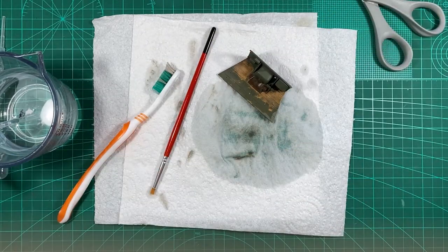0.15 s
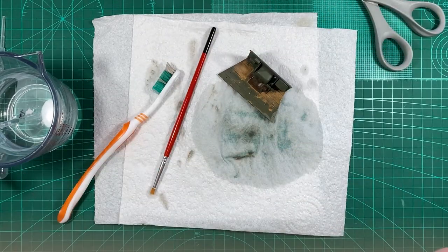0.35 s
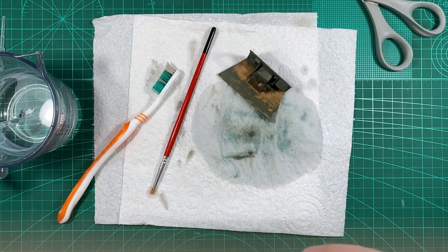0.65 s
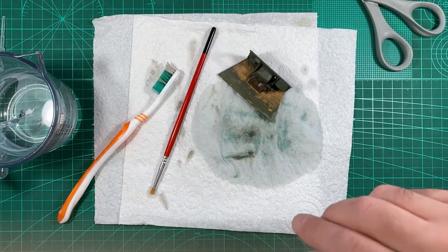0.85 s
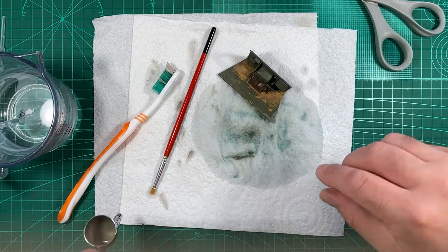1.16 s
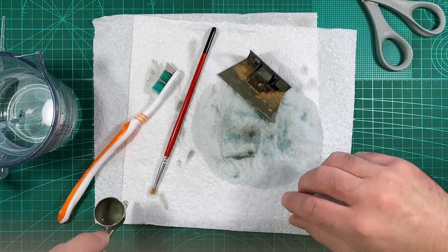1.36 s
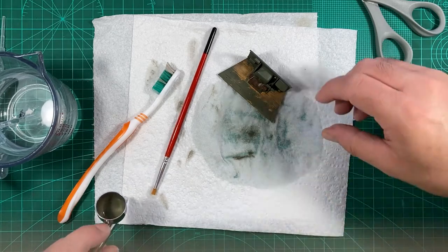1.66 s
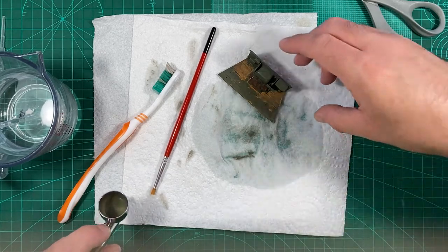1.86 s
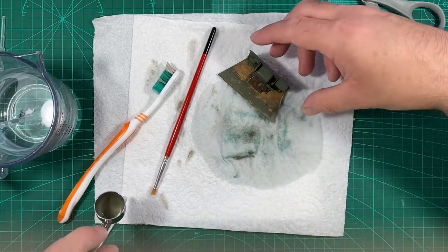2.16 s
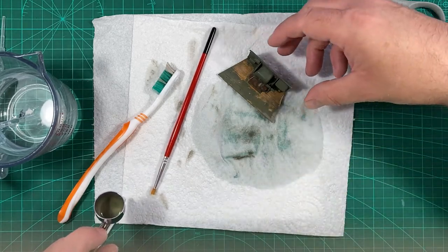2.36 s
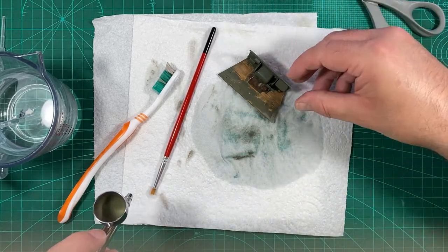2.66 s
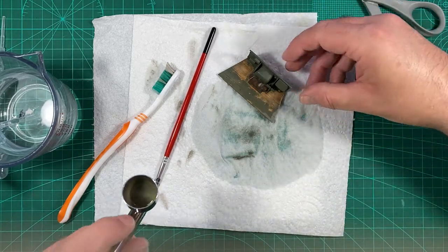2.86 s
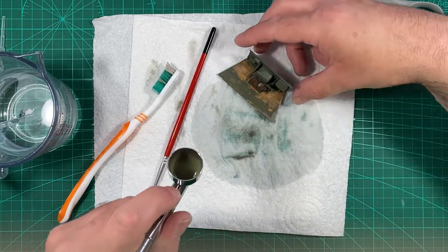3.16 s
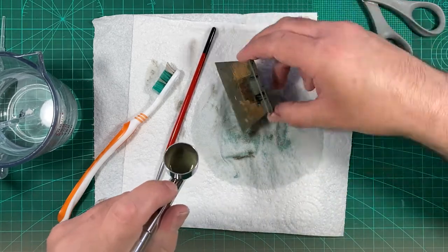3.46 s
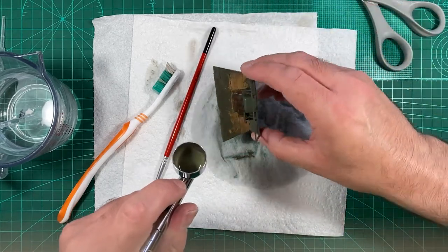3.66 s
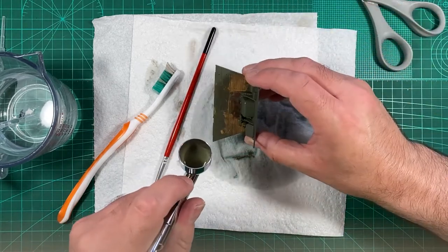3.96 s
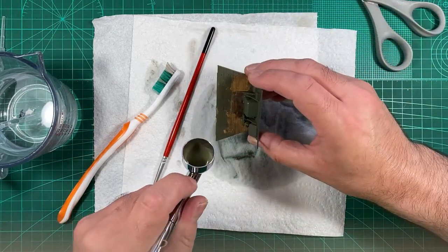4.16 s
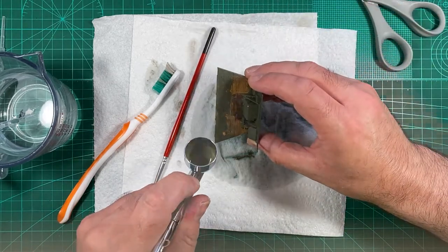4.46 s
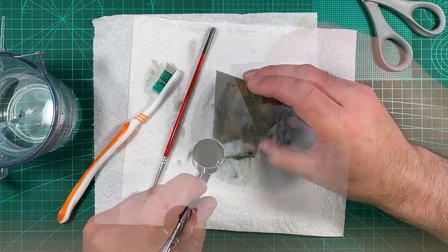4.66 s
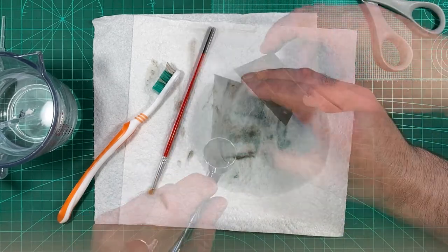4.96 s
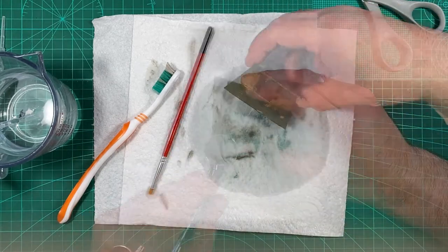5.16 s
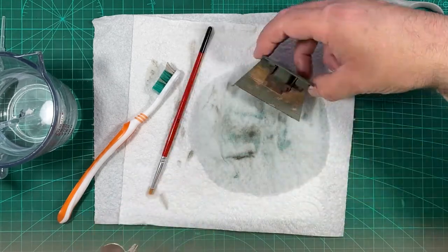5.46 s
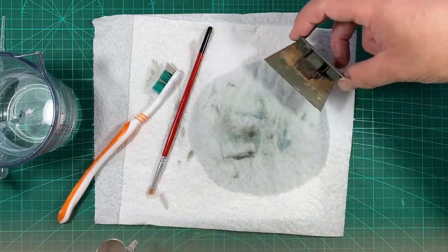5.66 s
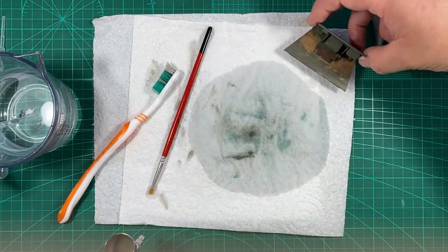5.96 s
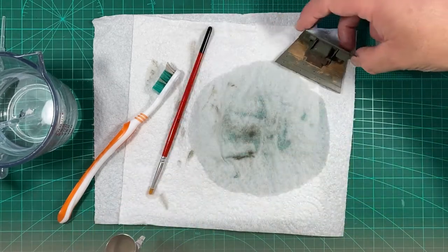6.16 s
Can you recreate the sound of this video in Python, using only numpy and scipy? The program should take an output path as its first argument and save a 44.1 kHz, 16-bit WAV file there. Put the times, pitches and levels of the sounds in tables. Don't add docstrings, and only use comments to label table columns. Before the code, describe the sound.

Quiet desk thuds and ticks, three short airbrush hisses, a stronger whistling air blast on a small part, then a compressor hum fading up.

```python
import sys
import numpy as np
from scipy import signal
from scipy.fft import irfft
from scipy.io import wavfile
from scipy.ndimage import uniform_filter1d

SR = 44100
rng = np.random.default_rng(int(sys.argv[2]) if len(sys.argv) > 2 else 0)


def transcribe(signal):
    frames = np.atleast_2d(signal).T
    limited = np.clip(frames, -1, 1)
    pcm = np.round(limited * 32767).astype(np.int16)
    wavfile.write(sys.argv[1], SR, pcm)


def gain_from_decibels(decibels):
    exponent = np.asarray(decibels, float) / 20
    return 10 ** exponent


N = 278712
T, HZ = np.arange(N) / SR, np.fft.rfftfreq(N, 1 / SR)
BLAST_OUT_S = 4.93

# pitch_hz, likeness (0-1)
SAME = [(60, 0.97), (300, 0.94), (700, 0.15), (1500, 0.046), (4000, 0.087), (5500, 0.2), (7000, 0.48),
        (15000, 0.75)]


def evened(x):
    return x / np.sqrt(np.mean(x ** 2) + 1e-20)


def read(points, hz):
    f, value = np.transpose(points)
    return np.interp(np.log(hz + 1), np.log(f + 1), value)


def bumps(peaks, hz=HZ):
    return sum(gain_from_decibels(db) / np.sqrt(1 + (2 * (hz - f) / width) ** 2) for f, width, db in peaks)


def hiss(gain, same=0.92):
    # pitch_hz, lead_rad
    lead_points = [(0, 0), (1000, -.6), (2600, -2.9), (4700, -3.14), (6900, 0), (15800, 4 * np.pi)]
    a, b, c, d = rng.standard_normal((4, len(HZ)))
    left, own = a + 1j * b, c + 1j * d
    alike = np.clip(same * read(SAME, HZ), 0, 1)
    lead = np.exp(1j * np.interp(HZ, *np.transpose(lead_points)))
    right = alike * lead * left + np.sqrt(1 - alike ** 2) * own
    return evened(irfft(np.array([left, right]) * gain, N))


def flutter(depth_db, size):
    wobble = uniform_filter1d(uniform_filter1d(rng.standard_normal(N), size), size)
    return gain_from_decibels(depth_db * evened(wobble))


def span(t0, t1, rise, fall):
    return np.clip((T - t0) / rise, 0, 1) * np.clip((t1 - T) / fall, 0, 1)


def ports(table):
    f, left_db, right_db = np.transpose(table)
    gains = gain_from_decibels([read(np.transpose([f, db]), HZ) for db in (left_db, right_db)])
    return gains * bumps([(0, 6800, 0)]) * (HZ < 9700)


def patchy(x, depth_db):
    z = signal.stft(x, SR, nperseg=512)[2]
    patches = uniform_filter1d(rng.standard_normal(z.shape[:0:-1]), size=9, axis=0)
    patches = uniform_filter1d(patches, size=4, axis=1).T
    return signal.istft(z * gain_from_decibels(depth_db * evened(patches)), SR, nperseg=512)[1][:, :N]


def air():
    # pitch_hz, level_db_per_hz
    air_points = [(45, -8), (90, -1), (140, -4), (250, -9.5), (500, -14.5), (900, -20), (1500, -25.5),
                  (2800, -27), (4400, -21), (6000, -29), (8000, -32.5), (11000, -33), (13500, -39.5),
                  (14700, -33.5)]
    # pitch_hz, width_hz, level_db
    air_lines = [(4140, 8.8, -3), (4880, 42, -5.5), (5130, 29, -11), (6940, 100, -14)]
    # start_s, end_s, level_db
    shifts = [
        (-0.21, .25, -68),
        (1.196, 1.89, -57.5),
        (1.785, 2.706, -57),
        (2.998, 3.7, -67),
    ]
    air_db, still_db, shift_s = -59, -65.5, 0.16
    power = gain_from_decibels(still_db) ** 2
    power = power + sum((gain_from_decibels(db) * span(s0, s1, shift_s, shift_s)) ** 2 for s0, s1, db in shifts)
    gain = gain_from_decibels(read(air_points, HZ))
    rumble = hiss(gain * bumps([(113, 390, 0)]) ** 2) * flutter(0.82, size=1500) * np.sqrt(power)
    whine = hiss(bumps(air_lines + [(4570, 350, -7.5)]) ** 2) * flutter(3.6, size=60)
    return gain_from_decibels(air_db - 5) * hiss(gain) * flutter(0.23, size=3000) + rumble + gain_from_decibels(air_db - 20.5) * whine


def thuds():
    # start_s, peak_db, boom_db, crack_db, length_s
    blows = [(0.398, -34, -6, -8, 0.081), (0.476, -41.5, -4.5, -13, 0.027), (0.888, -79, 28, -11, 0.057),
             (1.017, -47.5, -17, -31, 0.069), (1.2, -64, -4, -22, 0.048), (1.315, -38, -14, -32, 0.038),
             (1.375, -38.5, -15, 4, 0.032), (1.433, -50.5, -10, 11.5, 0.5), (1.71, -50.5, -19, 5, 0.34),
             (2.095, -54, -20, 10, 0.087), (2.157, -57.5, -18, 13, 0.11), (2.392, -36.5, 3.5, -32, 0.13),
             (2.463, -44, 3, -2, 0.074), (3.367, -41, 5.5, -39, 0.089), (3.435, -50, -15, -38, 0.057)]
    # pitch_hz, width_hz, level_db
    body = [(223, 88, 3.5), (287, 59, -11.5), (457, 57, -15.5), (616, 90, -13)]
    crack_peaks = [(570, 320, -4.5), (1290, 840, -4.5), (2300, 2300, 5.5), (4940, 1800, -4.5)]
    knock, boom, crack = np.zeros((3, N))
    for s, db, boom_db, crack_db, length_s in blows:
        age = np.maximum(T - s, 0)
        dying = gain_from_decibels(-60 * np.maximum(age - 0.33 * length_s, 0) / (3.9 * length_s))
        shape = gain_from_decibels(db) * np.clip(age / 0.0047, 0, 1) * dying
        knock += shape
        crack += np.sqrt(shape * gain_from_decibels(db)) * np.clip(age / 0.018, 0, 1) * gain_from_decibels(crack_db - 45 * age / 0.95)
        boom += gain_from_decibels(db + boom_db) * ((age / 0.045) * np.exp(1 - age / 0.053)) ** 2
    low = knock * hiss(bumps(body) ** 2) + gain_from_decibels(-5.0) * boom * hiss(bumps([(68.0, 100, 0)]) ** 2)
    return gain_from_decibels(-9.5) * (low + crack * hiss(bumps(crack_peaks) ** 2 * (HZ > 300)))


def handling():
    # start_s, peak_db, ring_hz, ring_t60_s, snap_db
    ticks = [(0.4, -53, 555, 0.078, -22), (0.403, -52.5, 415, .08, -20), (0.479, -57, 473, 0.048, -20),
             (0.412, -59, 1520, .04, -14), (0.41, -56, 2190, .04, -12), (0.512, -66, 590, .04, -20),
             (1.025, -54, 540, 0.04, -26), (1.026, -60, 368, 0.04, -24), (1.109, -69, 4100, 0.016, -7),
             (1.197, -77, 4000, .01, -8), (1.311, -57.5, 525, 0.11, -9), (1.311, -65, 2240, 0.011, -11),
             (1.313, -63, 5800, 0.065, -14), (1.317, -55, 980, 0.014, -18), (1.349, -59, 6000, 0.02, -20),
             (1.356, -61, 5900, 0.022, -20), (1.370, -51, 2300, 0.011, -4), (1.370, -45, 700, 0.021, -7),
             (1.376, -47, 377, 0.011, -20), (1.436, -32.5, 6200, 0.005, 12), (1.743, -51, 1480, .05, -20),
             (1.772, -65, 1500, 0.073, -20), (1.79, -50, 1590, 0.031, -16), (1.88, -61, 1610, .12, -20),
             (2.393, -47.5, 1430, 0.058, -16), (2.844, -63, 4250, .012, -10), (2.979, -63, 4220, .012, -8),
             (3.014, -57, 3870, 0.0095, -20), (3.026, -59, 4180, 0.012, -20), (3.125, -70, 6800, .008, -2),
             (3.249, -51, 4370, 0.013, -24), (3.262, -50, 4680, 0.018, -8), (3.295, -55, 3760, .012, -10),
             (3.347, -57, 4300, 0.013, -14), (3.372, -58, 515, 0.051, -30), (3.43, -69, 3000, 0.013, -8),
             (5.599, -46, 5900, 0.0045, -20)]
    # start_s, level_db, rise_s, dying_db_per_s
    slide = [
        (3.244, -58, 0.013, 162),
        (3.29, -72, 0.011, 150),
        (3.36, -58, 0.02, 302),
        (3.422, -73, 0.008, 400),
    ]
    # pitch_hz, level_db_per_hz
    paper = [(1180, -22), (2500, -12), (6680, -8), (7510, -14), (8600, -44), (10700, -23), (13200, -33),
             (15000, -5.5)]
    # pitch_hz, width_hz, level_db
    paper_rings = [(4100, 180, 0), (4800, 200, -3), (6550, 180, 1), (7300, 180, 3)]
    out, t = np.zeros((2, N)), np.arange(6000) / SR
    chance = np.resize(rng.standard_normal((14, 6000)), (len(ticks), 6000))
    for (s, db, hz, t60_s, snap_db), noise in zip(ticks, chance):
        pair = np.sin(2 * np.pi * hz * t) + .6 * np.sin(2 * np.pi * 1.06 * hz * t)
        ring = pair * np.minimum(t * hz / 2, 1) * gain_from_decibels(-60 * t / t60_s)
        top_hz = min(1.15 * hz + 1400, .45 * SR)
        blow = np.sign(noise) * gain_from_decibels(-60 * t / 0.006)
        snap = signal.lfilter(*signal.butter(3, [top_hz / 6, top_hz], "band", fs=SR), blow)
        tick = gain_from_decibels(db + 3.5) * (ring + gain_from_decibels(snap_db) * snap / abs(snap).max())
        for side, late in enumerate((5, 0)):
            out[side, round(s * SR) + late:][:6000] += tick
    slips = sum(span(s, 9, rise, 1) * gain_from_decibels(db - dying * np.maximum(T - s - rise, 0))
                for s, db, rise, dying in slide)
    drag = hiss(gain_from_decibels(read(paper, HZ)) * (1 + bumps(paper_rings))) * flutter(1.6, size=70)
    return out + drag * slips + snap_of_plastic()


def test_puffs():
    # start_s, end_s, level_db, opening_s
    puffs = [
        (1.36, 1.712, -42, 0.048),
        (1.936, 2.22, -42, 0.019),
        (2.327, 2.499, -42, 0.01),
    ]
    # pitch_hz, level_db_per_hz
    jet = [(400, -21), (700, -22.5), (1200, -17), (2000, -11), (3000, -8), (4200, -1.5), (5300, -2),
           (7000, -1.5), (8500, -2.5), (10200, -8.5), (12000, -7.5), (13500, -1.5), (14700, 5.5),
           (15600, 1.5)]
    # pitch_hz, width_hz, level_db
    jet_rings = [(4810, 180, -1.5), (5980, 37, -15), (7040, 260, -0.5)]
    # pitch_hz, left_minus_right_db
    jet_balance = [(700, 2), (3000, 2.5), (5300, 5), (7500, -1), (15000, .1)]
    swell_db_per_s, shut_s = 3.5, 0.011
    flow = sum(span(s0, s1, opening, shut_s) ** 2 * gain_from_decibels(db + swell_db_per_s * np.clip(T - s1, -1, 0))
               for s0, s1, db, opening in puffs)
    free = gain_from_decibels(np.outer([.5, -.5], read(jet_balance, HZ)) + read(jet, HZ)) * (1 + bumps(jet_rings))
    return patchy(gain_from_decibels(14.5) * hiss(free, same=1.2) * flow * flutter(0.5, size=90), depth_db=1.2)


def blast_at_part():
    # start_s, level_db, squareness (0-1)
    blast = [
        (3.956, -63, 0.4),
        (4.086, -43, 1),
        (4.131, -34.5, 0.96),
        (4.196, -36.5, 0.58),
        (4.29, -45, 0.89),
        (4.39, -44, 0.73),
        (4.548, -35, 0.16),
        (4.649, -50.5, 0.3),
        (4.882, -61, 0.44),
    ]
    # pitch_hz, left_db, right_db
    strike = [(640, -27, -27.5), (1230, -10.5, -14.5), (1970, -4, -6), (2610, 0, -4.5), (3600, -5, -10),
              (4050, -5, -17), (4300, 0.5, -22), (4850, -1.5, -4), (5300, 0.5, -3), (5600, -14, -20),
              (6200, -17, -18), (7170, 3, -3.5), (7600, -21, -13), (8950, -34, -44)]
    # pitch_hz, width_hz, level_db
    strike_rings = [(2950, 40, 2.5), (3500, 190, 6), (4100, 90, 2), (4560, 100, 6), (5780, 90, 3),
                    (6400, 80, 0), (6600, 150, 0.5), (7070, 110, 1.5)]
    # pitch_hz, left_db, right_db
    past_edge = [(700, -30, -43), (1300, -16, -48), (1920, -9, -25), (2690, -16, -7), (3380, 2, -15),
                 (3600, -5, -4), (4300, 4, -8), (5000, 1.5, -1), (5570, 5, 0), (5900, 8.5, 6.5),
                 (6200, 7, 5.5), (6730, 3.5, 6), (7600, -2.5, -9), (8600, -1, 1.5)]
    # pitch_hz, width_hz, level_db
    edge_rings = [(4070, 130, 6.5), (4540, 140, 0), (5000, 60, 0), (5720, 80, 1), (5900, 78, 1),
                  (6730, 100, 4), (7200, 80, 1), (7580, 100, 3)]
    # pitch_hz, level_db_per_hz
    blast_hiss = [(7000, -30), (7800, 1), (9000, -12), (10300, -12), (12000, -4.5), (13500, -0.5),
                  (15600, 3.5)]
    in_s, lands_s, landing_s = 3.94, 4.094, 0.023
    face_db, square_db, face_missed_db = 1.5, 16, -19.5
    edge_db, edge_missed_db = 10, -7.5
    s, db, square = np.transpose(blast)
    nozzle = span(in_s, BLAST_OUT_S, 0.014, 0.095) * gain_from_decibels(np.interp(T, s, db))
    missed = 1 - span(lands_s, 9, landing_s, 1)
    face = nozzle * gain_from_decibels(face_db + square_db * np.interp(T, s, square) + face_missed_db * missed)
    edge = nozzle * gain_from_decibels(edge_db + edge_missed_db * missed)
    roar = hiss(ports(strike) * (1 + bumps(strike_rings)), same=5.9) * face
    whistle = gain_from_decibels(2.0) * hiss(ports(past_edge) * (1 + bumps(edge_rings)), same=3.5) * edge
    treble = gain_from_decibels(11.5) * hiss(gain_from_decibels(read(blast_hiss, HZ)) * (HZ > 6000)) * nozzle
    return patchy(roar + whistle, depth_db=1.2) * flutter(0.66, size=40) + treble


def compressor():
    # hum_multiple, shaft_multiple, rms_db,
    # left_minus_right_db
    tones = [(0, 2, -42, 0), (1, -2, -51, 0), (0, 3, -49, 0), (1, -1, -54, 2), (0, 4, -48, 1),
             (1, 0, -37, -1), (0, 5, -40, -2), (1, 1, -47, -4), (2, -3, -52, -3), (0, 6, -48, 0),
             (1, 2, -45, 0), (1, 3, -39, 2), (-1, 12, -57, -1), (0, 8, -51, 2), (0, 9, -55, 0),
             (1, 5, -57, 0), (2, 1, -56, 3), (0, 10, -51, 6), (1, 6, -53, -2), (0, 11, -49, -1),
             (2, 3, -52, 0), (0, 12, -48, 5), (0, 13, -55, -1), (0, 14, -53, 0), (0, 15, -55, 3),
             (2, 7, -54, 4), (0, 16, -56, 11), (0, 19, -48, -8), (1, 15, -57, -6), (0, 20, -51, 13),
             (0, 21, -61, 15), (0, 22, -65, 11), (2, 14, -60, 6), (0, 28, -55, 8), (0, 29, -60, 0),
                  (1, 25, -61, -3), (0, 30, -64, 12), (0, 32, -61, 9), (1, 33, -61, 15), (1, 34, -62, 2),
                  (2, 30, -62, -4), (0, 40, -58, 14), (1, 37, -61, -2), (1, 38, -57, 12), (1, 46, -54, 0),
                  (-1, 56, -51, -2), (1, 48, -51, -9), (-1, 57, -50, -1), (1, 49, -53, 15),
                  (-1, 58, -55, -6), (1, 50, -53, 9), (-1, 59, -55, -11), (1, 51, -55, 7),
                  (-1, 60, -54, -3), (1, 52, -56, -3), (2, 49, -54, 10), (1, 60, -51, 2), (2, 56, -50, 0),
                  (2, 57, -54, 0), (2, 64, -54, 1), (2, 39, -61, 10), (2, 40, -55, 12), (1, 29, -62, 8)]
    families_db = [-16.5, 1, 8, -1.5, -5, -0.5, 6.5, -4, -11]
    # pitch_hz, level_db_per_hz
    casing = [(45, -2), (130, -2), (280, -5), (450, -16.5), (580, -23.5), (900, -15), (1070, -25),
              (1180, -3), (1390, -11), (1480, 2), (1570, -11), (1680, -6), (2050, -30), (3000, -45)]
    # pitch_hz, width_hz, level_db
    casing_rings = [(686, 50, 1.5), (930, 67, -28), (1380, 94, -13)]
    # pitch_hz, level_db_per_hz
    intake = [(60, -43), (200, -15.5), (500, -18), (1300, -18), (2100, -18.5), (3000, -25), (5500, -25.5),
              (8500, -40.5), (11000, -54), (13500, -47.5), (15400, -46)]
    shaft_hz, mains_hum_hz = 23.174, 99.93
    left_leads_s = 0.00042
    fade_from_s, fade_to_s, fade_bend, running_db = 3.947, 5, 0.9, -0.03

    hum, shaft = np.meshgrid(np.arange(-2, 7), np.arange(-30, 160))
    hz = np.clip(hum * mains_hum_hz + shaft * shaft_hz, 0, None)
    db = -52 + read(casing, hz) + families_db
    lines = rng.standard_normal((2,) + hz.shape) + 1j * rng.standard_normal((2,) + hz.shape)
    lines = lines * gain_from_decibels(db) * (hz > 40)
    lines *= 0.94 + bumps(casing_rings, hz)
    lines /= np.sqrt(1 + (abs(lines) / gain_from_decibels(-56.5)) ** 2)
    alike = np.clip(read(SAME, hz), 0, 1)
    lines[1] = alike * lines[0] + np.sqrt(1 - alike ** 2) * lines[1]
    spectrum = np.zeros((2, len(HZ)), complex)
    spectrum[:, np.round(hz * N / SR).astype(int)] = lines

    for m, k, tone_db, pan_db in tones:
        f = m * mains_hum_hz + k * shaft_hz
        stray = rng.uniform(-np.pi, np.pi) * np.array([0, 1 - read(SAME, f)]) ** 2
        delay = np.array([0, 2 * np.pi * f * left_leads_s])
        phase = stray - delay + rng.uniform(0, 2 * np.pi)
        level = np.sqrt(2) * gain_from_decibels(tone_db + pan_db * np.array([.5, -.5]))
        spectrum[:, round(f * N / SR)] = level * np.exp(1j * phase)

    valves = 1 + 0.097 * np.cos(4 * np.pi * shaft_hz * T)
    breathy = gain_from_decibels(-45.0) * hiss(gain_from_decibels(read(intake, HZ))) * valves
    fade = span(fade_from_s, 9, fade_to_s - fade_from_s, 1) ** fade_bend
    return (irfft(spectrum, N) * N / 2 + breathy) * gain_from_decibels(running_db) * fade


def hollow():
    # pitch_hz, width_hz, level_db
    linger = [(4180, 130, 1), (5100, 130, 0), (3730, 200, -18)]
    from_s, level_db, dying_db_per_s, rise_s = 4.54, -42.5, 44, 0.12
    level = gain_from_decibels(level_db - dying_db_per_s * np.clip(T - from_s - rise_s, 0, 1))
    level = level * span(from_s, BLAST_OUT_S, rise_s, 0.092)
    return hiss(bumps(linger) ** 2, same=0.3) * flutter(1.5, size=400) * level


def snap_of_plastic():
    # pitch_hz, level_db_per_hz
    click_points = [(1200, -20), (2200, -1), (3800, 1), (6000, 1), (7500, -5), (8800, -24), (12300, -25),
                    (15200, -19)]
    click_s, click_db = 5.5995, -18.5
    late_s = click_s + np.array([[5 / SR], [0]])
    pulse = irfft(1j * gain_from_decibels(read(click_points, HZ)) * np.exp(-2j * np.pi * HZ * late_s), N)
    return gain_from_decibels(click_db) * pulse / abs(pulse).max()


def room(x):
    # pitch_hz, t60_s
    decay = [(200, 0.23), (1000, 0.65), (3000, 0.65), (4500, 0.64), (7000, 0.46), (15000, 0.29)]
    taps = rng.choice([-1., 1.], (2, SR)) * (rng.random((2, SR)) < .05)
    taps[:, :200] = 0
    hz, t, z = signal.stft(taps, SR, nperseg=256)
    dying = gain_from_decibels(-60 * t / np.maximum(read(decay, hz), .05)[:, None])
    tail = signal.istft(z * dying, SR, nperseg=256)[1]
    return signal.fftconvolve(x, tail / np.linalg.norm(tail[0]), axes=1)[:, :N]


def scene():
    jet, hands, far = test_puffs() + blast_at_part(), handling(), thuds()
    dull = signal.lfilter(*signal.butter(2, 5500, fs=SR), hands)
    tail = room(gain_from_decibels(-6) * jet + gain_from_decibels(0.0) * dull + gain_from_decibels(-11.0) * far)
    return jet + hands + far + tail + compressor() + air() + hollow()


def blocks(hz, t, bins, frames):
    dice = rng.random((len(hz) // bins + 1, len(t) // frames + 1))
    return dice.repeat(bins, axis=0).repeat(frames, axis=1)[:len(hz), :len(t)]


def thinned_treble(x):
    # from_hz, to_hz
    no_mid = [(8500, 9650), (13350, 13750)]
    # from_hz, to_hz
    no_side = [(7250, 7200), (10600, 11800), (15500, 17000)]
    # from_hz, to_hz, share (0-1)
    specks = [(2300, 3600, .09), (9900, 10800, .3), (13700, 14300, .3)]
    edge_hz = 15780
    hz, t, z = signal.stft(np.array([x[0] + x[1], x[0] - x[1]]) / 2, SR, nperseg=1024)
    whole = z.copy()

    def mid_level(lo, hi):
        return abs(z[0, (hz > lo) & (hz < hi)]).mean(0)

    treble = mid_level(9000, np.inf)
    click = treble > 2.5 * np.maximum(np.roll(treble, 2), np.roll(treble, -2))
    airy = 1.4 * mid_level(14300, edge_hz) > mid_level(2000, 3500)

    for part, bands in zip(z, (no_mid, no_side)):
        for lo, hi in bands:
            hop_hz = 170 * abs(np.round(1.6 * rng.standard_normal((2, len(t) // 4 + 1))))
            hop_hz = hop_hz.repeat(4, axis=1)[:, :len(t)]
            part *= (hz[:, None] < lo - hop_hz[0]) | (hz[:, None] > hi + hop_hz[1])

    strong = mid_level(4000, 8000) > mid_level(900, 2000)
    dice, fine = blocks(hz, t, 6, 4), blocks(hz, t, 3, 3)
    for lo, hi, share in specks:
        if lo > 5000:
            holes = strong & (dice < share)
        else:
            holes = airy & strong & (fine < share)
        z[0] *= ~(((hz > lo) & (hz < hi))[:, None] & holes)

    faint = mid_level(14700, edge_hz) < 1.8 * mid_level(10900, 12500)
    faint = uniform_filter1d(1. * faint, size=5) > .5
    kept_from_hz = np.where(dice[0] < .45, edge_hz, 14400 + 900 * dice[-1])
    z *= ~(faint & (hz[:, None] > 13000) & (hz[:, None] < kept_from_hz))

    floor = gain_from_decibels(-63) * uniform_filter1d(abs(z).max(axis=(0, 1)), size=24)
    smooth = uniform_filter1d(uniform_filter1d(abs(z), size=3, axis=1), size=5, axis=2)
    z *= (smooth > floor) | (hz < 7800)[:, None]
    z *= (hz < edge_hz)[:, None]
    z = np.where(click & (hz < 16400)[:, None], whole, z)
    mid, side = signal.istft(z, SR, nperseg=1024)[1][:, :N]
    return np.array([mid + side, mid - side])


def low_pass(x):
    return signal.sosfilt(signal.butter(12, 17080, fs=SR, output="sos"), x)


def record(dry):
    low_cut = signal.butter(6, 39, "high", fs=SR, output="sos")
    return low_pass(signal.sosfilt(low_cut, thinned_treble(dry)))


dry = scene()
out = record(dry)
transcribe(out)
```